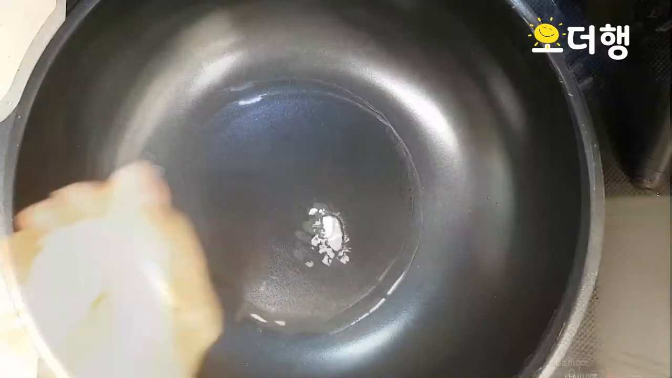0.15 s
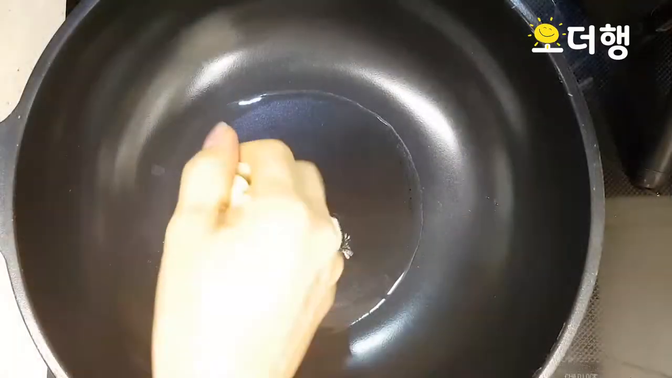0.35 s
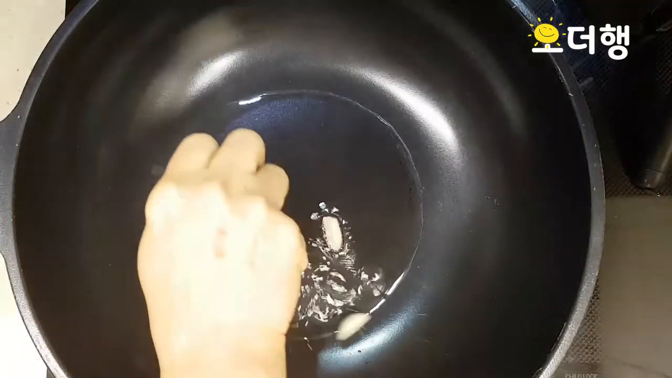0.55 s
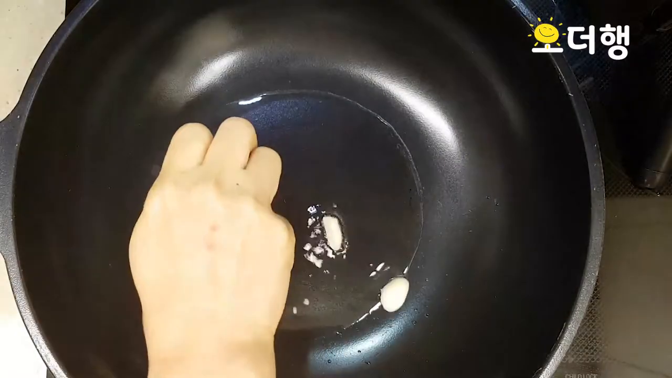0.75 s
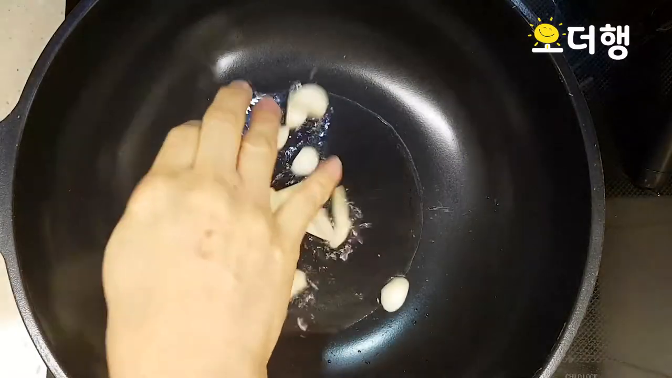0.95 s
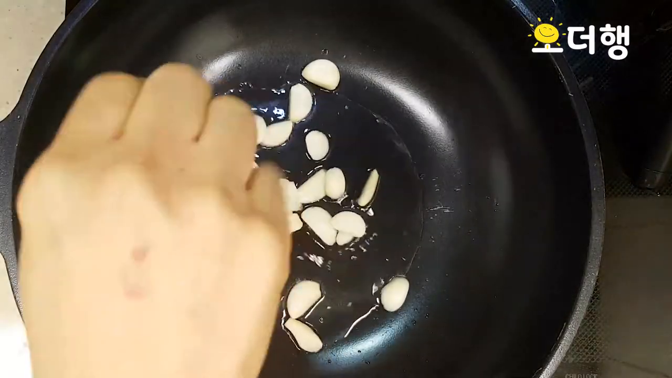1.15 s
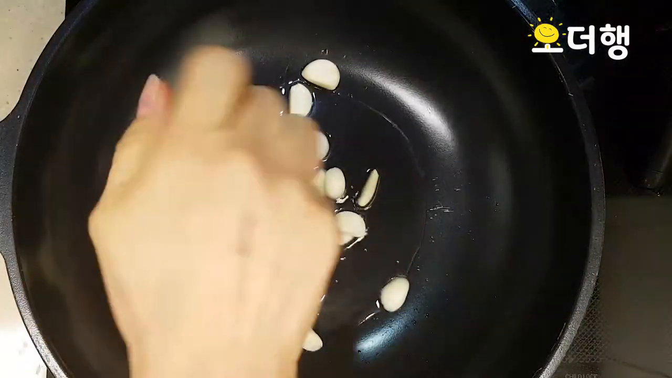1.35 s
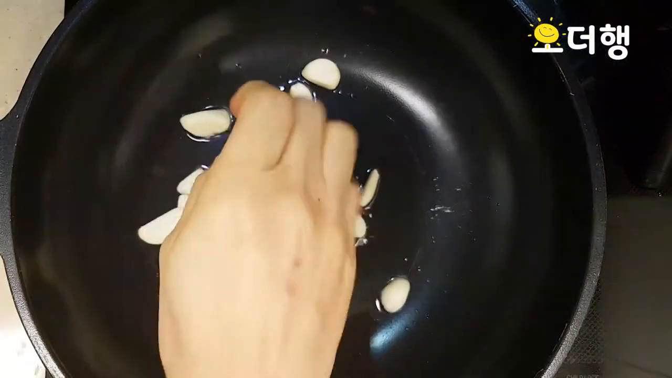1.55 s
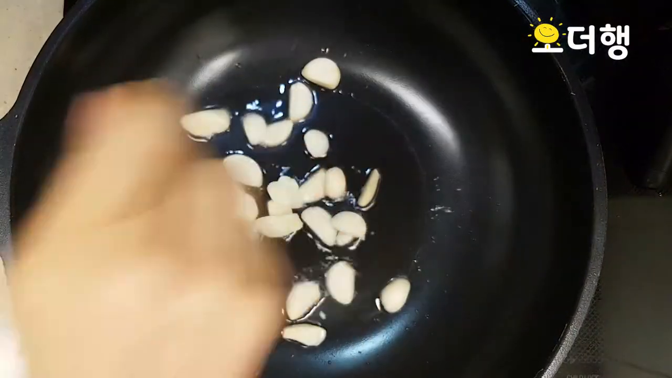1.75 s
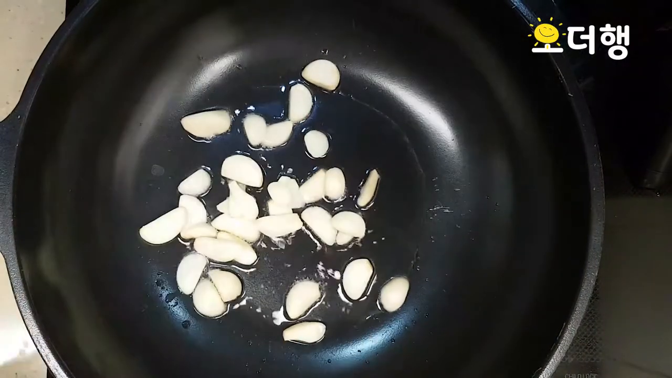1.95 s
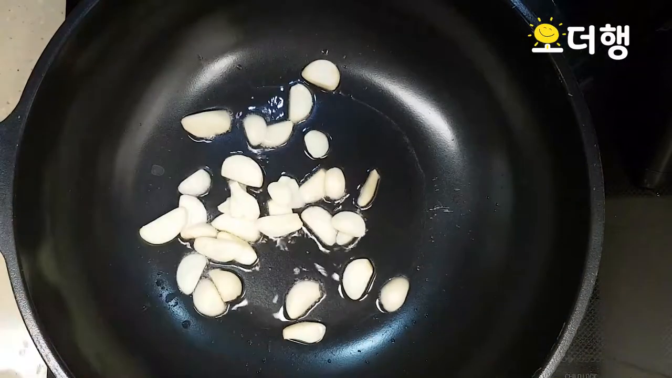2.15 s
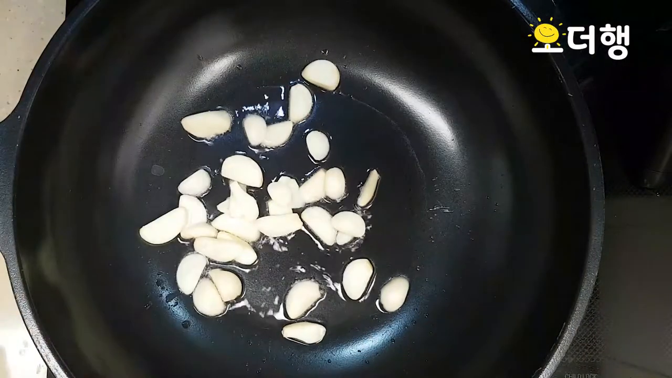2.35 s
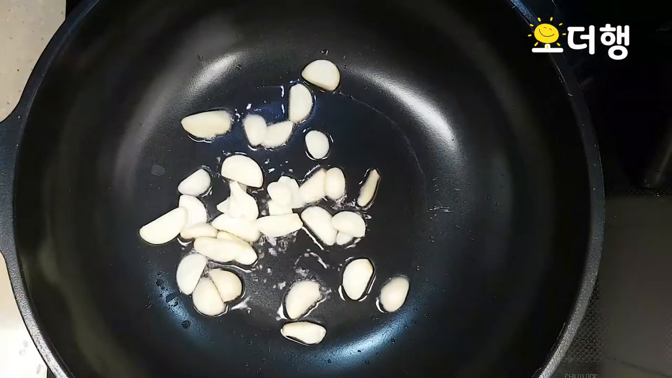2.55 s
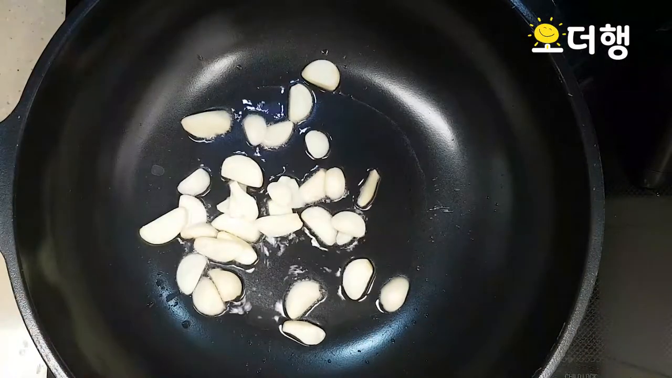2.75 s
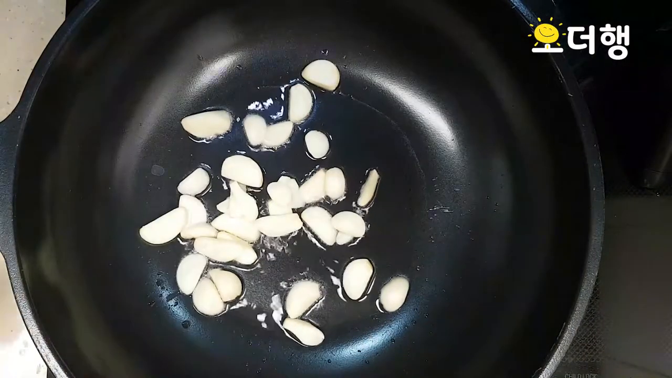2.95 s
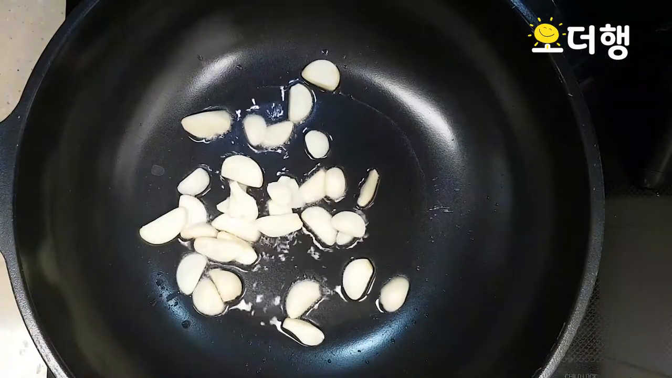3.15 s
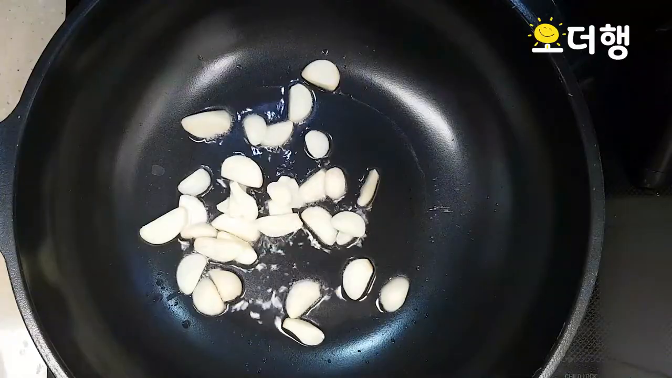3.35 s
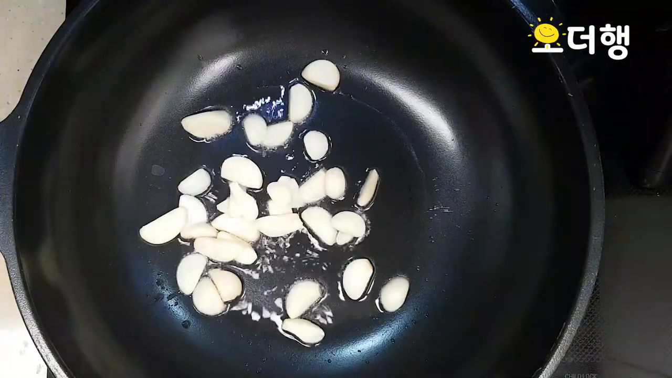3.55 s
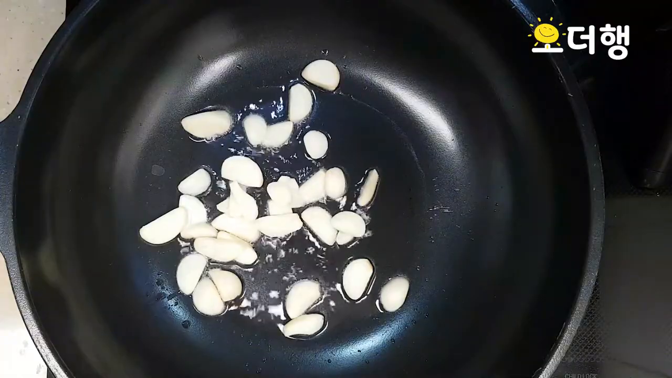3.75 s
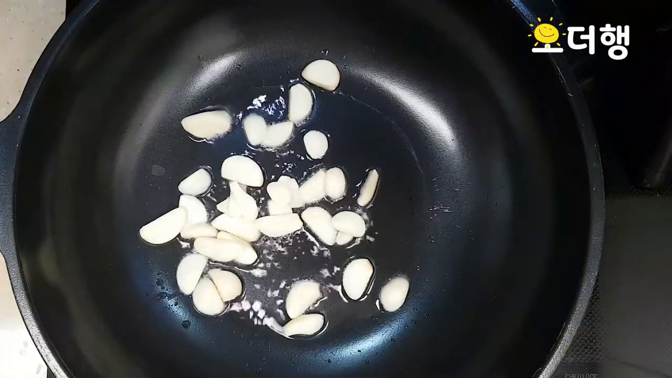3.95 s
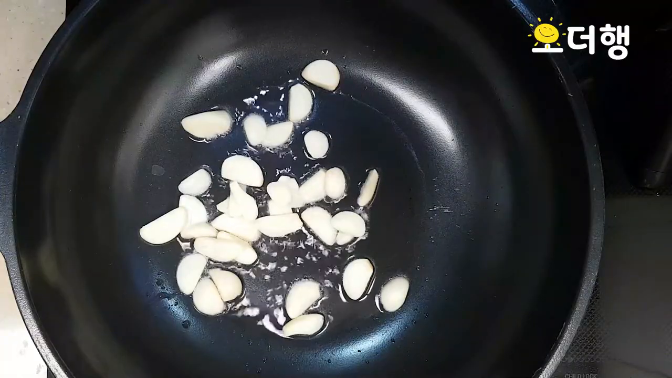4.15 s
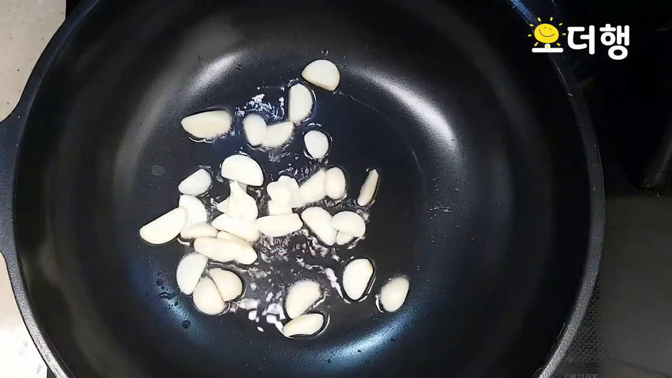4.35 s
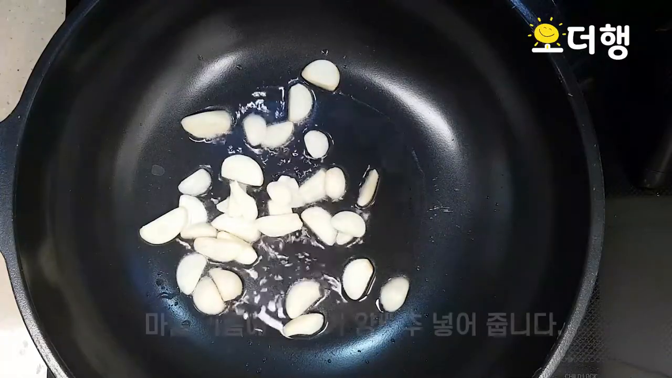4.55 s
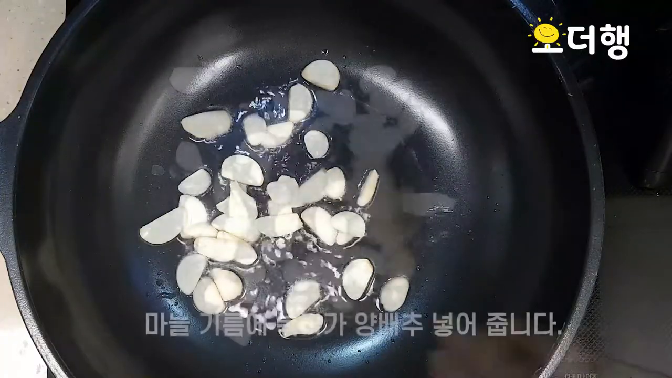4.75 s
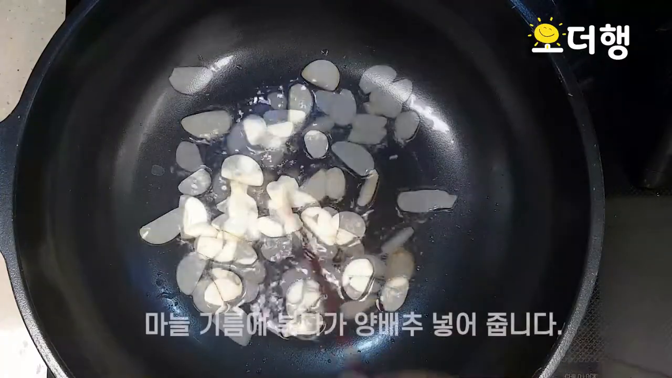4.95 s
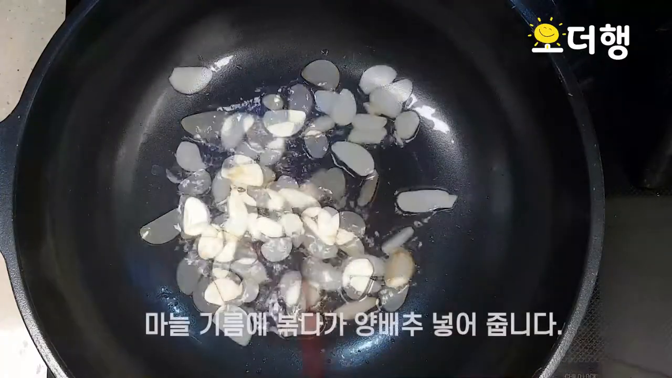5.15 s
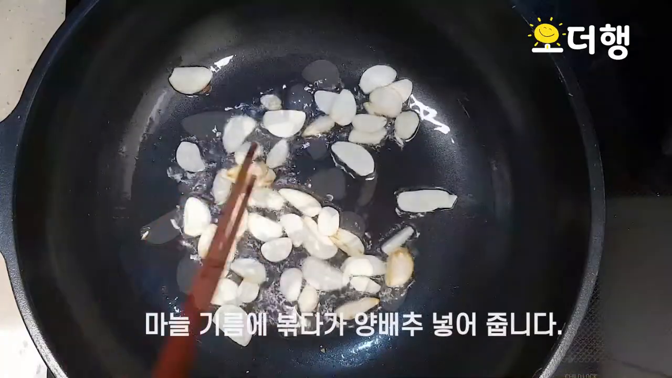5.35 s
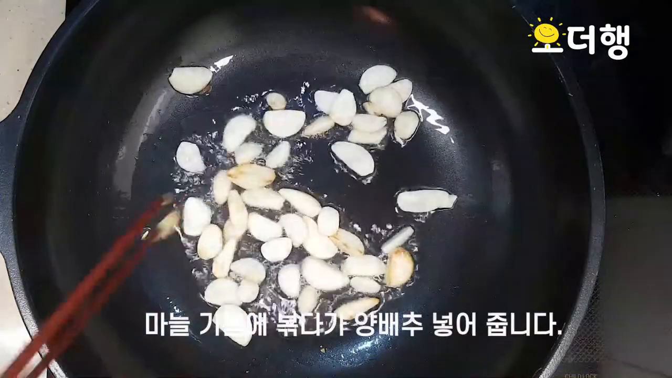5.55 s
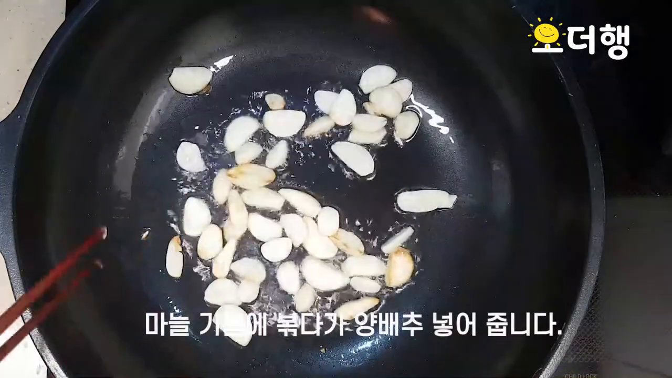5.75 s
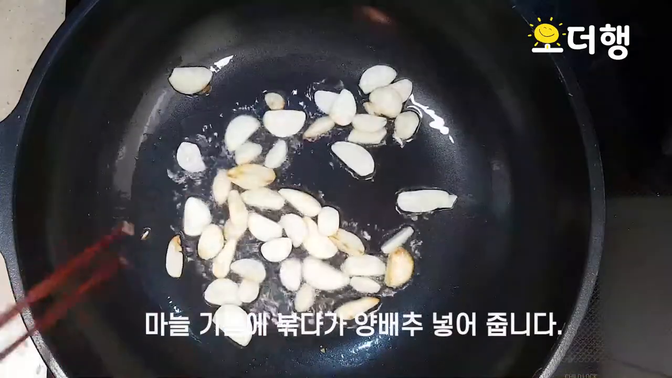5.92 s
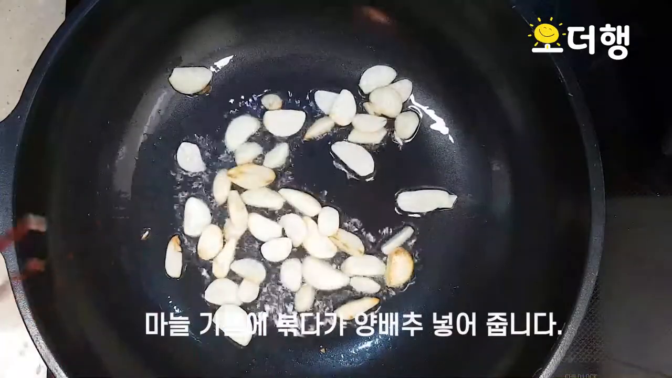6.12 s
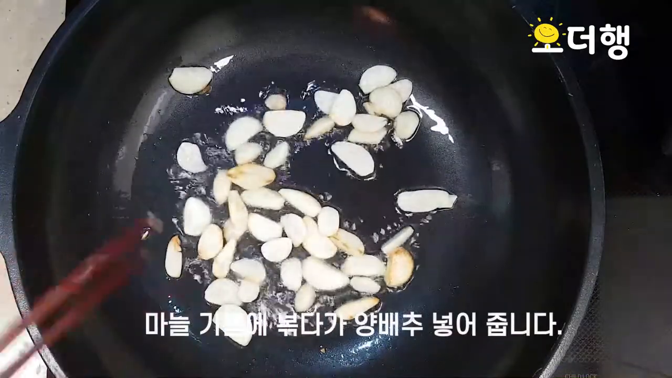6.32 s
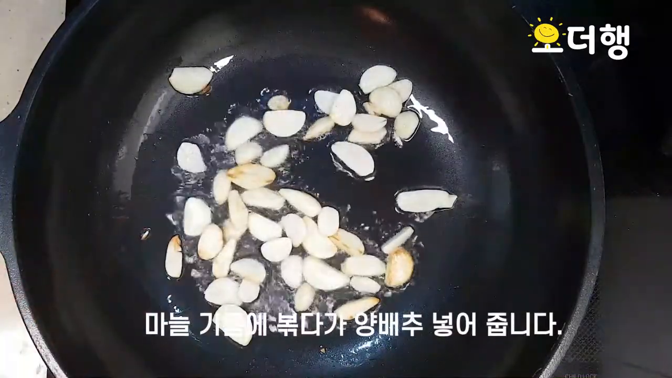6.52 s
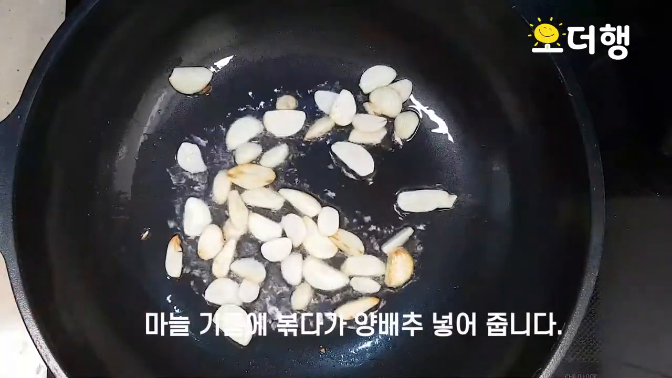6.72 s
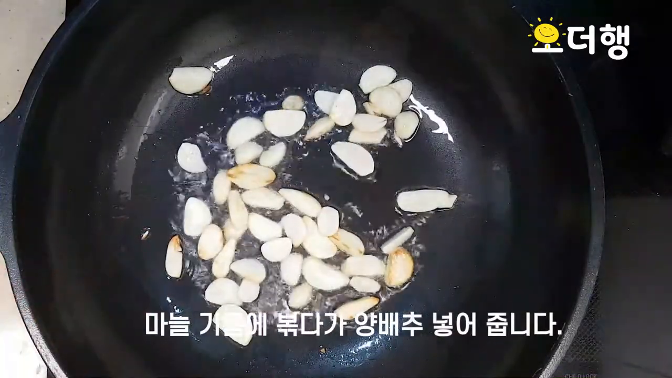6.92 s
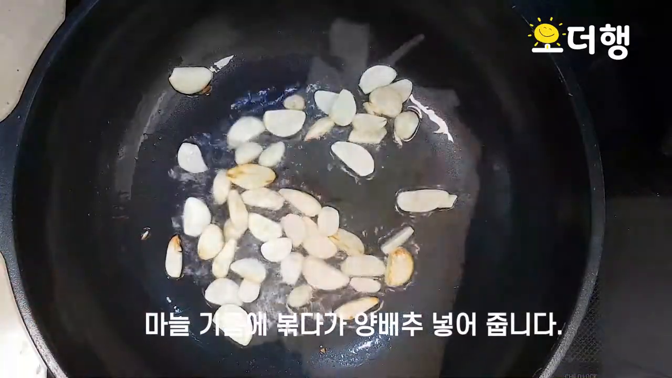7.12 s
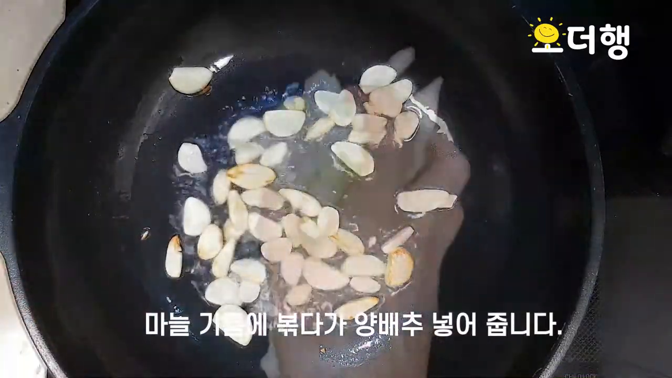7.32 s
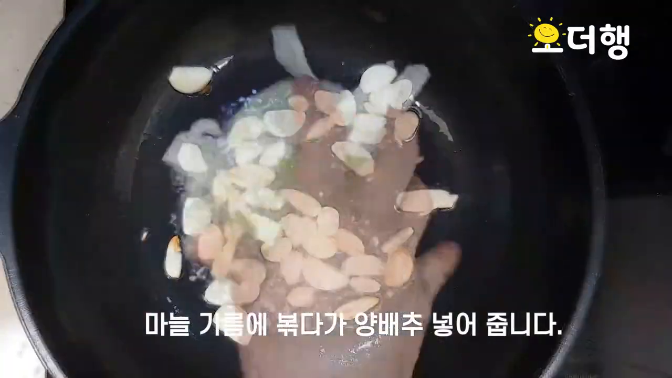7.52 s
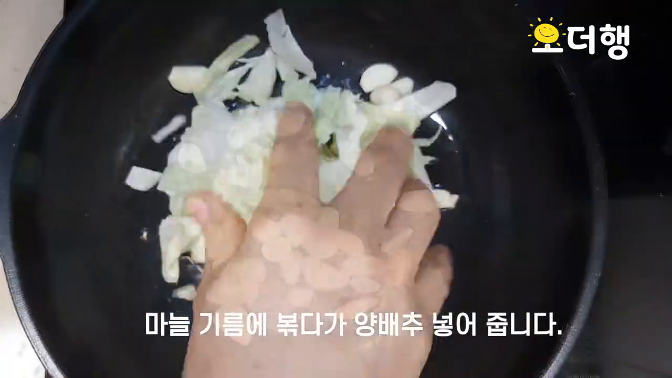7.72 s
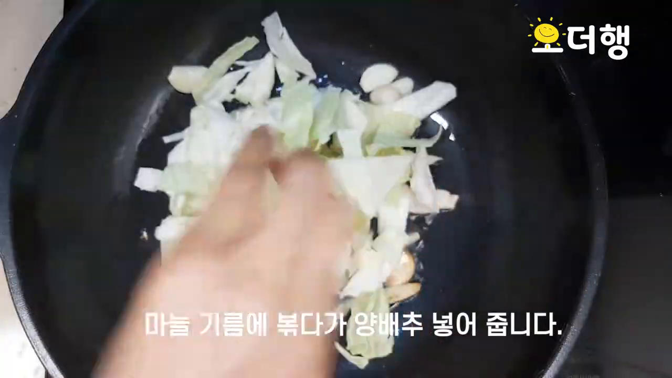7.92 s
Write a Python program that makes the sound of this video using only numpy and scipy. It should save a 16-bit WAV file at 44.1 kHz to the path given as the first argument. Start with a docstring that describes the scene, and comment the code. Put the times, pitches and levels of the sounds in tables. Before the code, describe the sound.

A close stereo microphone over a wok in a small kitchen hears a faint wavering low hum, soft air rumble and very quiet oil fizz, with light thuds and small spits around 0.5-0.7 s. At about 0.9 s garlic slices patter onto the metal in quick succession and a fine, bright sizzle flares, then slowly thins. Bubbles pop at irregular moments; firmer soft thuds come near 1.6 s, and a sharp dry snap at 3.65 s. Around 5 s the sizzle shifts to browned garlic, with crisp fizz over more distinct coarse bubbling; a strong pop comes at 6.5 s. At 7.1 s chopsticks clack loudly against a dish with tiny bounces, and the frying briefly swells. From 7.45 s wet cabbage covers the garlic: louder, coarse, uneven crackling, steam hiss, spits and pops continue to the end at roughly 8 s, while hum and rumble sink.

```python
"""Garlic sizzles in hot oil in a wok; then a handful of wet cabbage goes in and turns it to a coarse crackle.
The frying is swarms of short random bubble rings, coloured by smooth spectra and faded stage by stage.
On top, bubbles pop, droplets spit, slices thud and chopsticks clack: noise bursts ringing in resonances.
The microphone hangs over the bowl in a small kitchen, with the cooker's wavering sine hum and noise rumble."""
import sys
import numpy as np
from scipy import signal
from scipy.fft import rfft, irfft, next_fast_len
from scipy.io import wavfile

SR = 44100
rng = np.random.default_rng(int(sys.argv[2]) if len(sys.argv) > 2 else 0)


def waveform_to_disk(signal):
    """Save audio, clipped to [-1, 1], as 16-bit WAV at the path in sys.argv[1]."""
    frames = np.transpose(np.atleast_2d(signal))
    scaled = np.clip(frames, -1, 1) * 32767
    samples = np.round(scaled).astype(np.int16)
    wavfile.write(sys.argv[1], SR, samples)


N = 356328

# stages of the frying [s]: the garlic lands, it has browned, the cabbage lands
GARLIC_S, BROWNED_S, CABBAGE_S = 0.872, 5.045, 7.453
SMOTHER_S = .15   # the cabbage takes this long to cover the garlic


def garlic():
    """Fine fizz that fades as the slices dry, over coarser bubbling; the cabbage smothers both."""
    # fizz of fresh garlic in the oil: (frequency [Hz], relative level [dB])
    fizz_spectrum = [(1410, -54), (2400, -16), (3170, 0.5), (3540, -2), (4570, 1), (5180, 0.5), (5660, 2),
                     (6580, -3.5), (8350, 2.5), (10000, -5), (12700, -2.5), (15100, -4.5), (16000, -10)]
    # fizz of hot oil, bare or with browned garlic: (frequency [Hz], relative level [dB])
    hot_fizz_spectrum = [(1410, -43), (2400, -6), (2700, -4.5), (3960, -3), (4750, -3), (7290, -3),
                         (8480, -3.5), (9940, -4), (12300, 0), (15100, -5.5), (16000, -17)]
    # coarse bubbling: (frequency [Hz], relative level [dB])
    bubbling_spectrum = [(200, -16), (500, 3), (1100, -1), (1800, 2.5), (2800, -8), (4000, -11.5),
                         (8000, -12)]

    flash_db = 5.5 * np.exp(-since(GARLIC_S) / 0.33)   # surface moisture boils off first
    fresh_db = -43 - 1.34 * since(GARLIC_S) + flash_db   # drying, in dB per second
    browned_db = -42.5 - 1.1 * since(BROWNED_S)
    fizz_db = by_stage(-67, fresh_db, browned_db) + 0.12 * drift(17)
    bubbling_db = by_stage(-62.5, -55, -48.5) + swell() + .5 * drift(10)
    uncovered = 1 - ramp(CABBAGE_S, SMOTHER_S)

    tiny = rms_one(grains(per_s=11000, spread_db=3.5, width_hz=1770))
    stray = rms_one(grains(per_s=130, spread_db=3.0, width_hz=470))   # sparse, longer ticks out of the hiss
    bubbles = tiny + .33 * stray

    hot = by_stage(1, 0.52, 1)   # fresh, moist slices cool the oil and change the fizz's colour
    cool_fizz = rms_one(colour(bubbles, fizz_spectrum))
    hot_fizz = rms_one(colour(bubbles, hot_fizz_spectrum))
    fizz = (1 - hot) * cool_fizz + hot * hot_fizz
    bubbling = rms_one(colour(bubbles, bubbling_spectrum))
    return uncovered * (from_db(fizz_db) * fizz + from_db(bubbling_db) * bubbling)


def cabbage():
    """Wet leaves crackle and steam, the more the more have landed; brittle snaps are broadband clicks."""
    # coarse crackle: (frequency [Hz], relative level [dB])
    crackle_spectrum = [(250, -17), (400, -10), (560, 2.5), (1100, -4.5), (1700, 5.5), (2100, -1.5),
                        (3000, 3.5), (4000, -3), (6500, -15), (9000, -19)]
    # hiss of steam: (frequency [Hz], relative level [dB])
    steam_spectrum = [(2940, -15), (5000, -1), (8540, -2), (10000, -5), (11800, -3), (15200, -8),
                      (16000, -15)]

    landed = ramp(CABBAGE_S, .4)
    sizes = rng.uniform(0.24, 1, N) * (rng.random(N) < 110 / SR)   # 110 snaps a second
    snap = paths(bowl_db=2, room_db=-4, bowl_t60=.025)
    snaps = rms_one(signal.oaconvolve(sizes[None], snap, axes=1)[:, :N])
    bubbles = rms_one(grains(per_s=4000, spread_db=4.2, width_hz=1100)) + .75 * snaps

    crackle_db = -38.4 + 2 * drift(30)   # the leaves land in clumps, so the crackle comes in bursts
    crackle = from_db(crackle_db) * rms_one(colour(bubbles, crackle_spectrum))
    steam = from_db(-36) * rms_one(colour(bubbles, steam_spectrum))
    return landed * crackle + landed ** .5 * steam   # steam comes up faster than crackle


def grains(per_s, spread_db, width_hz, pitches=16, spots=4):
    """Countless tiny bubbles of random size ring at a spread of pitches, at several spots in the pan."""
    # air trapped in the bowl: (frequency [Hz], width [Hz], lift [dB])
    bowl_modes = [(970, 19, 2.5), (1158, 75, 6.5), (1590, 110, 2), (1740, 29, 2.5), (2720, 124, 5),
                  (3240, 220, 2), (4770, 300, 2.5), (5880, 350, 2), (8480, 620, 4.5)]
    out = 0
    for spot in np.geomspace(700, 15000, pitches).reshape(-1, spots).T:
        rings = 0
        for hz in spot:
            scale = np.sqrt(hz / 4000)   # higher pitches burst more often and ring more broadly
            born = np.flatnonzero(rng.random(N) < per_s * scale / pitches / SR)
            size_db = spread_db * np.minimum(rng.exponential(1, N), 5)
            strengths = rms_one(from_db(size_db) * rng.choice([-1, 1], N))
            clicks = np.zeros(N)
            clicks[born] = strengths[born]
            rings = rings + rms_one(resonate(clicks, hz, width_hz * scale)) * np.sqrt(hz)
        out = out + signal.oaconvolve(rings[None], paths(bowl_db=4.5, room_db=5), axes=1)[:, :N]
    return out + sum((from_db(db) - 1) * resonate(out, hz, width) for hz, width, db in bowl_modes)


def pops(snap_db=-21):
    """A bursting bubble snaps, then its cavity rings for a few cycles."""
    # big bubbles: (time [s], nominal peak [dB], pitch [Hz], ring to -60 dB [cycles], left over right [dB])
    big_bubbles = [(.395, -39, 12000, 14, 0), (0.4818, -31, 3100, 11, -1.5), (0.9696, -24.5, 6300, 9.2, -2),
                   (1.398, -27, 6900, 23, -5), (1.7947, -28.5, 3400, 6, -3), (1.9028, -26.5, 7060, 26, -4),
                   (2.126, -35, 3170, 4.9, -2), (2.5055, -31, 4560, 27, -3), (2.5644, -23.5, 4590, 96, -1),
                   (2.588, -24, 4850, 44, -1), (2.8196, -29.5, 3230, 11, 0), (3.1574, -24.5, 7400, 23, -4),
                   (3.8778, -32, 5460, 12, 3), (4.1172, -27.5, 7900, 20, -2), (4.192, -24.5, 2900, 10, -3),
                   (4.359, -29, 3160, 18, 0), (4.6748, -36.5, 1800, 12, 0), (4.837, -23.5, 8130, 26, -3.5),
                   (5.25, -30, 4900, 9.2, 1), (5.437, -23.5, 8950, 13, -1), (6.4665, -19.5, 5120, 17, -0.5),
                   (7.1696, -35, 1980, 26, -3), (7.2472, -36, 2430, 28, -2), (7.5604, -29, 2700, 23, -1),
                   (7.7328, -28, 1620, 23, -1), (7.8905, -21.5, 1700, 5.2, -1)]
    # lesser bubbles over garlic: (from [s], to [s], nominal peak [dB], lowest pitch [Hz], highest pitch [Hz])
    garlic_bubbles = (2, 4.5, -35.5, 2600, 5500)
    # the same over cabbage: (from [s], to [s], nominal peak [dB], lowest pitch [Hz], highest pitch [Hz])
    cabbage_bubbles = (7.62, 8, -30.5, 1500, 4200)

    lesser = lesser_bubbles(*garlic_bubbles, count=9) + lesser_bubbles(*cabbage_bubbles, count=12)
    out = np.zeros((2, N))
    for s, db, hz, cycles, pan_db in big_bubbles + lesser:
        snap = paths(bowl_db=3.5, room_db=-1.5, bowl_t60=.035, room_t60=.2)
        ring = resonate(snap, hz, np.log(1000) / np.pi * hz / max(cycles, 2))
        dull_snap = cut(snap, 2 * hz, "low")   # the bubble's size bounds the snap on both sides
        pop = cut(ring + from_db(snap_db) * dull_snap, 0.3 * hz, "high")
        add(out, s, db, pop * from_db([[pan_db / 2], [-pan_db / 2]]), crest_db=8)
    return out


def lesser_bubbles(start_s, end_s, db, low_hz, high_hz, count):
    """Equally strong pops of random moment, pitch and place, each ringing for 15 cycles."""
    pan_db = 3 * rng.standard_normal(count)
    hz = low_hz * (high_hz / low_hz) ** rng.random(count)
    return list(zip(scatter(start_s, end_s, count), [db] * count, hz, [15] * count, pan_db))


def spits(top_hz=11000):
    """A droplet boils away in a short, broad spray; the tiniest give only a dry snap."""
    # water flashing to steam in the oil: (time [s], nominal peak [dB], t60 [s])
    sprays = [(0.481, -42, .046), (.634, -33.5, .11), (.652, -33, .11), (.672, -28.5, 0.059),
              (0.707, -37.5, 0.73), (.905, -29.5, 0.13), (.93, -25, 0.045), (4.192, -28, 0.17),
              (4.483, -29, 0.021), (4.914, -28.5, .03), (7.632, -26, .046), (7.851, -21, 0.047)]
    # tiny droplets snapping: (time [s], nominal peak [dB])
    tiny_snaps = [(1.5493, -19), (3.465, -25), (3.6499, -12), (3.7349, -23), (4.725, -23), (5.437, -19)]

    out = np.zeros((2, N))
    for s, db, t60 in sprays:
        spray = paths(bowl_db=20, room_db=14.5, bowl_t60=max(t60, .003))
        spray = cut(cut(spray, 2700, "high", order=1), top_hz, "low", order=1)
        add(out, s, db, spray, crest_db=10.0)
    # more of them fly off the wet cabbage at random
    off_leaves = [(s, -22) for s in scatter(CABBAGE_S + SMOTHER_S, N / SR, count=4)]
    for s, db in tiny_snaps + off_leaves:
        snap = paths(bowl_db=-2, room_db=-7, bowl_t60=.025)
        add(out, s, db, cut(snap, 8200, "high") * from_db([[2], [-2]]), crest_db=18.5)
    return out


def thuds(rattle_db=9):
    """A soft slice meets the metal and rings its low modes, with random strengths for the spot of contact."""
    # slices landing or hopping: (time [s], nominal peak [dB], contact brightness [Hz], rattle t60 [s])
    slices = [(.094, -34, 654, 0.11), (.117, -38, 695, .09), (.199, -35.5, 1720, .18),
              (.479, -34.5, 1440, 0.051), (.629, -35, 1310, .13), (.873, -35, 1000, 0.041),
              (1.565, -19.5, 2470, 0.064), (1.634, -21, 2530, 0.032), (1.711, -34.5, 2000, 0.068),
              (1.833, -26.5, 4500, 0.085), (2.821, -32.5, 3500, 0.052), (3.115, -27.5, 2180, 0.032),
              (3.693, -27, 4500, 0.036), (4.108, -26.5, 2500, 0.03), (5.609, -32, 5000, 0.17)]
    # the wok under a soft blow: (frequency [Hz], width [Hz], mean level [dB])
    wok_modes = [(560, 63, -8), (610, 98, -1), (780, 270, -4), (937, 53, -2), (1150, 110, -0.5),
                 (1370, 160, -9), (1625, 260, -8.5), (1750, 93, -11), (2870, 270, -1)]

    out = np.zeros((2, N))
    for s, db, bright_hz, t60 in slices + handful():
        t60 = max(t60, .005)
        after_db = rattle_db + 20 * np.log10(10 * t60)   # a long rattle outweighs the first touch
        push = cut(paths(bowl_db=after_db, room_db=after_db - 2.0, bowl_t60=t60), bright_hz, "low")
        body = 0
        for hz, width, level_db in wok_modes:
            spot_db = rng.normal(0, 1.4)
            body = body + from_db(level_db + spot_db) * resonate(push, hz, width)
        add(out, s, db, cut(body, 325, "high") + 0.41 * cut(push, 340, "high"), crest_db=10.5)
    return out


def handful(count=4):
    """Slices strike in quick succession; half as many softer, longer tumbles follow."""
    first_s, gap_s, tumble_gap_s, bright_hz = .902, .0097, 0.023, 1040
    landings = [(first_s + k * gap_s, -25.5, bright_hz, 0.074) for k in range(count)]
    last_s = landings[-1][0]
    tumbles = [(last_s + (k + 1) * tumble_gap_s, -34, bright_hz, 0.48) for k in range(count // 2)]
    return landings + tumbles


def chopsticks(crack_db=-9):
    """Hard sticks crack against a dish and ring briefly."""
    # chopsticks put down, and their bounces: (time [s], nominal peak [dB])
    clacks = [(7.0776, -8), (7.080, -14.5), (7.092, -12.5), (7.17, -24), (7.19, -26)]
    # what they set ringing: (frequency [Hz], width [Hz], relative level [dB])
    clack_modes = [(546, 110, -3), (1310, 220, 2.5), (1860, 97, 8), (2400, 570, 0.5), (2900, 56, 5),
                   (3120, 46, -4), (4040, 44, 5), (6040, 140, 7.5), (7750, 56, 3), (8240, 450, 7.5),
                   (10700, 240, 0.5), (12600, 540, 5), (13200, 25, 10)]

    out = np.zeros((2, N))
    for s, db in clacks:
        crack = paths(bowl_db=11, room_db=8, bowl_t60=.05, room_t60=.17)
        ring = sum(from_db(level_db) * resonate(crack, hz, width) for hz, width, level_db in clack_modes)
        add(out, s, db, from_db(crack_db) * cut(crack, 420, "high") + ring, crest_db=11.5)
    return out


def nudges(width_hz=80):
    """The whole pan shifts with a low bump."""
    # dull nudges of the wok on its stand: (time [s], nominal peak [dB], pitch [Hz])
    bumps = [(.908, -37, 115), (1.563, -40, 113), (1.835, -38, 348), (1.892, -37, 186), (2.525, -41.5, 344),
             (2.543, -40, 215), (7.085, -35, 170), (7.43, -40.5, 110)]
    out = np.zeros((2, N))
    for s, db, hz in bumps:
        bump = resonate(paths(bowl_db=13.5, room_db=5, bowl_t60=0.17), hz, width_hz)
        add(out, s, db, cut(bump, 2 * hz, "low"), crest_db=10.5)
    return out


def cooker():
    """A wavering low hum and the soft rumble of moving air; both sink as the cabbage goes in."""
    # rumble: (frequency [Hz], relative level [dB])
    rumble_spectrum = [(20, 2.5), (32, -23), (45, -13), (90, 0.5), (135, 1.5), (260, -5.5), (500, -5),
                       (1000, -16), (2000, -46), (5000, -30.5)]

    sunk = ramp(7.41, 0.08)
    hum_db = -53.5 - 13 * sunk + 1.0 * drift(5.5)
    rumble_db = -56 - 8.5 * sunk + swell()
    hum_hz = 58.6 + 0.68 * drift(3)
    hum = np.sqrt(2) * np.sin(2 * np.pi * np.cumsum(hum_hz) / SR)   # RMS of 1
    air = rng.standard_normal(N) + 0.5 * rng.standard_normal((2, N))   # partly shared by both channels
    # faint drone in the air stream
    air = air + 0.37 * resonate(air, 144, 6) + 0.81 * resonate(air, 214.0, 6.3)
    return from_db(hum_db) * hum + from_db(rumble_db) * rms_one(colour(air, rumble_spectrum))


def scene():
    """The sizzle of garlic and cabbage, the single sounds on top of it, and the cooker."""
    frying = garlic() + cabbage()
    return frying + pops() + spits() + thuds() + chopsticks() + nudges() + cooker()


def record(dry):
    """Two microphone ports, the left one mostly brighter; a steep filter cuts the top."""
    # port contrast, scaled by each port's power: (frequency [Hz], unscaled left over right [dB])
    port_spectrum = [(60, 2), (400, 2.5), (1500, .5), (7800, 1), (9300, 4.5), (12800, 6), (15000, -2)]
    left = colour(dry[0], port_spectrum, power=0.43)
    right = colour(dry[1], port_spectrum, power=-0.8)
    top_cut = signal.ellip(10, .2, 70, 15900, fs=SR, output="sos")
    return signal.sosfilt(top_cut, np.array([left, right]))


def paths(bowl_db, room_db, bowl_t60=0.063, room_t60=0.14, shared_hz=750):
    """From one spot in the oil to the ports: direct sound, quick echoes in the bowl, then the kitchen."""
    def echoes():
        return from_db(bowl_db) * burst(bowl_t60) + from_db(room_db) * burst(room_t60)

    # long waves reach both ports alike
    long_waves = cut(echoes()[0], shared_hz, "low", order=1)
    short_waves = cut(echoes(), shared_hz, "high", order=1)
    out = long_waves + short_waves
    out[0, 0] += 1
    out[1, rng.integers(10)] += 1   # the direct sound reaches the right port up to 9 samples later
    return out


def burst(t60, size=12000):
    """Stereo noise of unit mean energy per channel that dies away."""
    x = rng.standard_normal((2, size)) * np.exp(-np.log(1000) * np.arange(size) / SR / t60)
    return x / np.sqrt(np.sum(x ** 2) / 2)


def add(out, s, db, sound, crest_db):
    """Place a blow by nominal peak: RMS of its first hundredth of a second plus an assumed crest."""
    at = max(round(s * SR), 0)
    strength = np.sqrt(np.mean(sound[:, :SR // 100] ** 2))
    out[:, at:at + sound.shape[1]] += (sound * from_db(db - crest_db) / strength)[:, :N - at]


def swell():
    """A short rise and fall of level in dB, just after the clack."""
    peak_s, peak_db, width_s = 7.2, 8, 0.083
    return peak_db * np.exp(-((np.arange(N) / SR - peak_s) / width_s) ** 2)


def by_stage(oil, fresh, browned, change_s=0.066):
    """A value that passes from bare oil to fresh garlic to browned garlic."""
    to_fresh = (fresh - oil) * ramp(GARLIC_S, change_s)
    to_browned = (browned - fresh) * ramp(BROWNED_S, change_s)
    return oil + to_fresh + to_browned


def since(s):
    """Seconds gone by since a moment, sample by sample; zero before it."""
    return np.maximum(np.arange(N) / SR - s, 0)


def ramp(s, length_s):
    """Rises from 0 to 1, starting at a moment."""
    return np.minimum(since(s) / length_s, 1)


def scatter(start_s, end_s, count):
    """Random moments, one in each equal part of a span."""
    moments = start_s + (end_s - start_s) * (np.arange(count) + rng.random(count)) / count
    return np.minimum(moments, (N - 1) / SR)


def drift(rate):
    """Slow chance with an RMS of 1: straight lines between random knots, 2 * rate of them a second."""
    knots = rng.standard_normal(int(N / SR * 2 * rate) + 2)
    return rms_one(np.interp(np.arange(N) / SR * 2 * rate, np.arange(len(knots)), knots))


def colour(x, spectrum, power=1):
    """Shape a sound by a smooth spectrum, its dB scaled by power."""
    hz, db = np.transpose(spectrum)
    size = next_fast_len(N + 4096)
    bins = np.maximum(np.fft.rfftfreq(size, 1 / SR), 1)
    gain = from_db(power * np.interp(np.log(bins), np.log(hz), db))
    return irfft(rfft(x, size) * gain, size)[..., :N]


def cut(x, hz, kind, order=2):
    """Butterworth filter that lets the low or the high side through."""
    return signal.sosfilt(signal.butter(order, min(hz, SR / 2 - 100), kind, fs=SR, output="sos"), x)


def resonate(x, hz, width):
    """One resonance with gain of about 1 at its top."""
    r = np.exp(-np.pi * width / SR)
    feed = np.array([1, 0, -1]) * (1 - r * r) / 2
    return signal.lfilter(feed, [1, -2 * r * np.cos(2 * np.pi * hz / SR), r * r], x + 1e-18)


def from_db(db):
    """Decibels to amplitude."""
    return 10 ** (np.asarray(db) / 20)


def rms_one(x):
    """Scale to an RMS of 1."""
    return x / np.sqrt(np.mean(x ** 2) + 1e-20)


dry = scene()
out = record(dry)
waveform_to_disk(out)
```